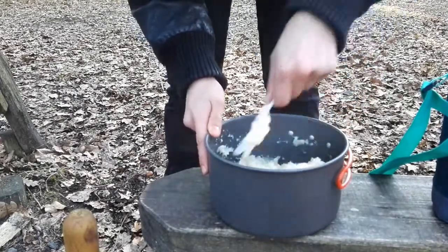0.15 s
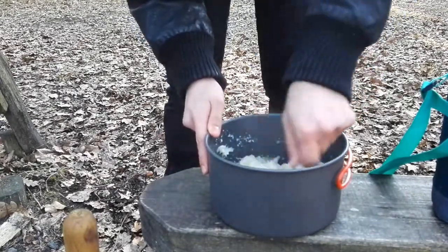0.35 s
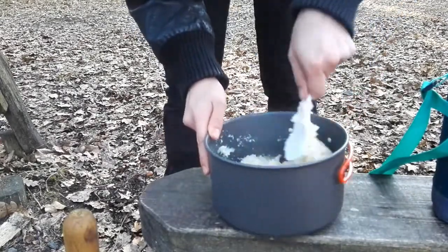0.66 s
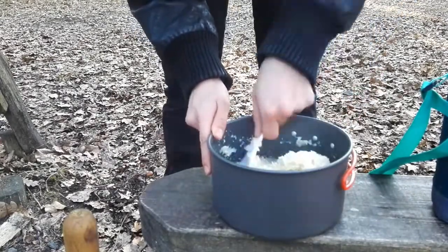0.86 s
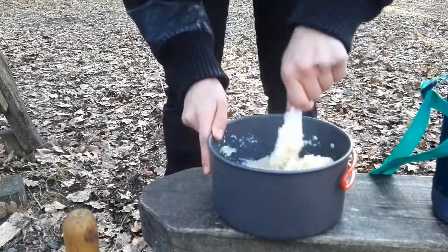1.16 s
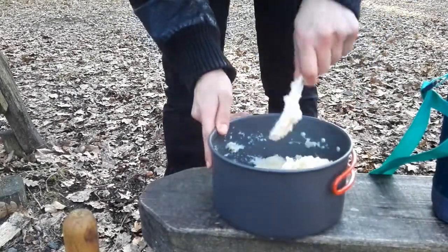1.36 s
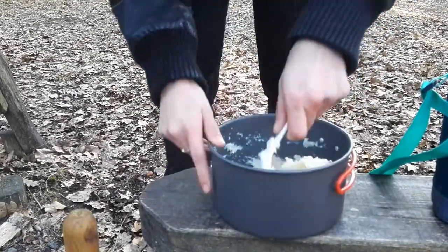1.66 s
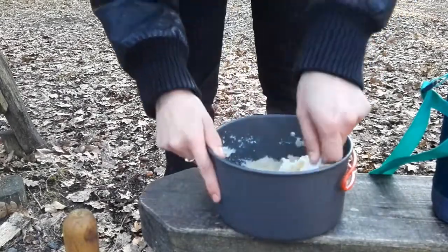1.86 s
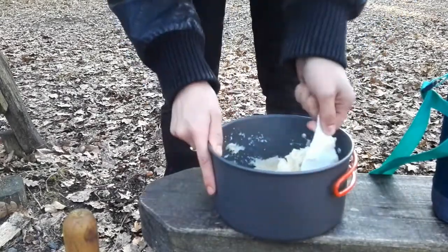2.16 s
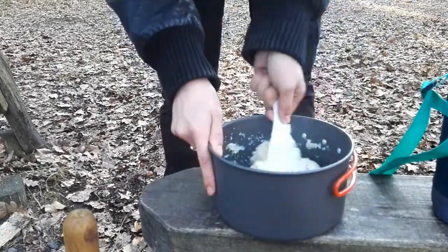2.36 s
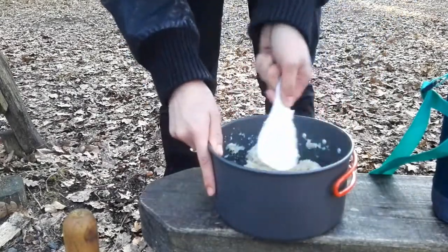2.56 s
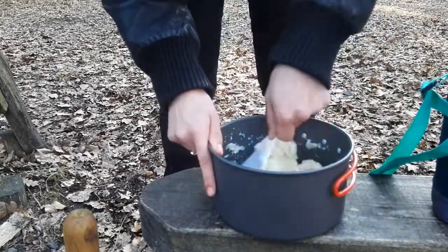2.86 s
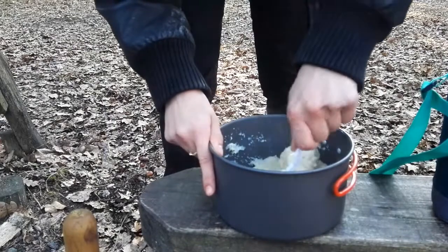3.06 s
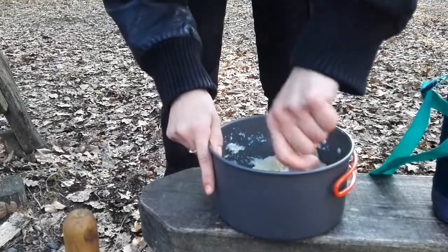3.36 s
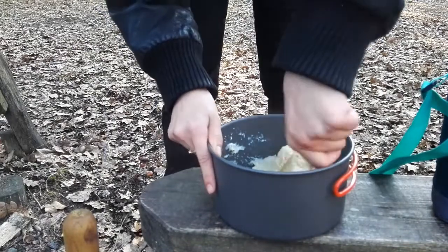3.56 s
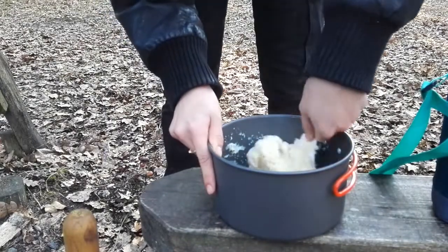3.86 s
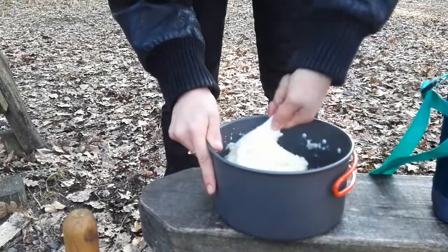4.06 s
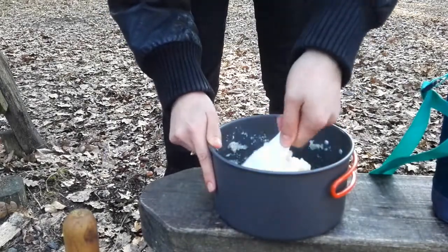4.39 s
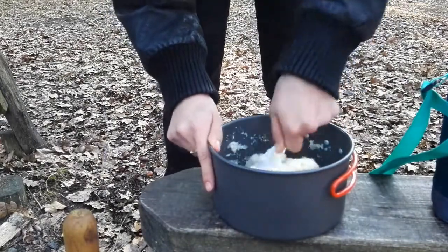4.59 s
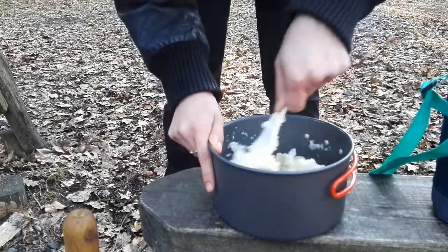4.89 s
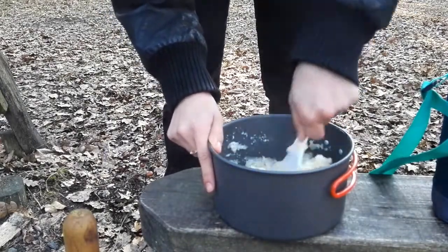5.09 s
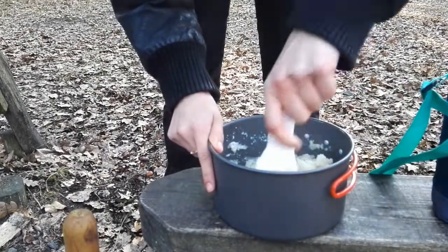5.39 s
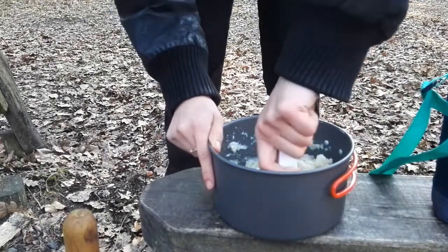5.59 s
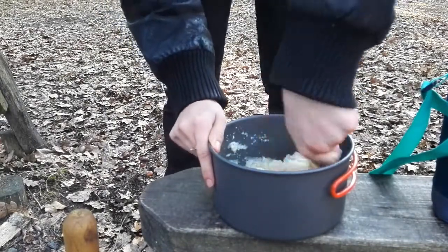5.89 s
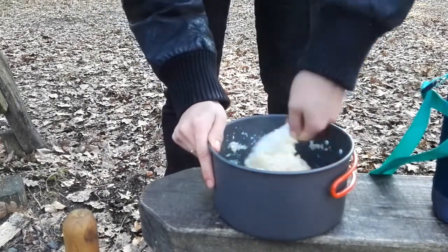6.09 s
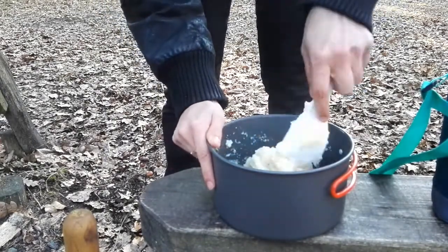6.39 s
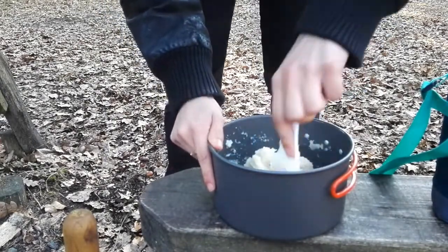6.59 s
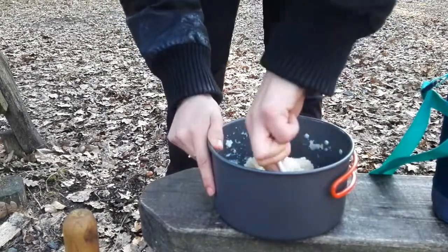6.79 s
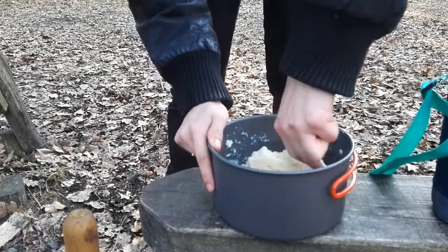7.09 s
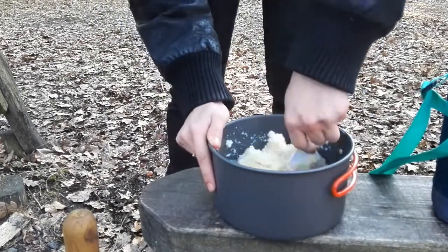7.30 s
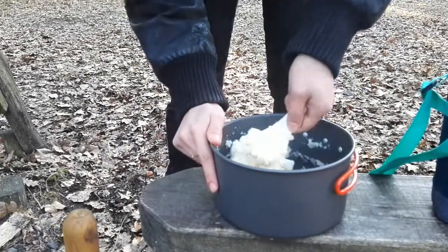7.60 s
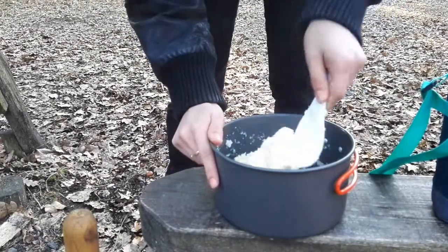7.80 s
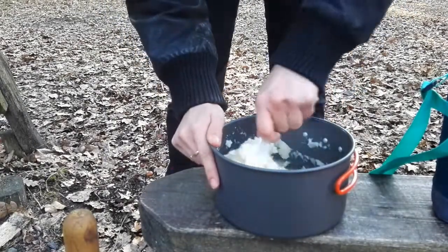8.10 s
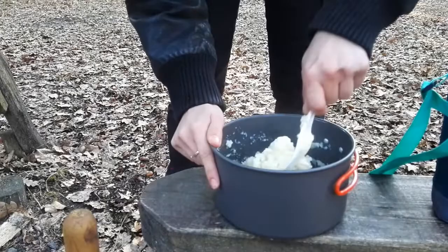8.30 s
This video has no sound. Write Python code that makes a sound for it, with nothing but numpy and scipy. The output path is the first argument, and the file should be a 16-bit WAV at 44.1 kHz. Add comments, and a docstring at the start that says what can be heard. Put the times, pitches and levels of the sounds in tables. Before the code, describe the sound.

Close up in quiet open air, a plastic spoon works thick mash in a metal pot on a wooden bench. Soft wet smearing leads to a hard knock and scraping, then one louder short clank near three seconds. More scrapes and hollow taps follow, with the strongest rubbing near the end. Uneven low rumble and dull microphone bumps continue underneath.

```python
"""A plastic spoon stirs thick mash in an aluminium camping pot, held by one hand on a wooden bench in a wood.
Quiet outdoor air (filtered noise) and an uneven low rumble (noise in swells) with soft microphone bumps run throughout.
From about half a second pushes of the spoon smear the mash with a wet hiss, and most scrape the wall (grainy noise).
Taps on the bottom and knocks on the damped wall soon join (decaying modes and noise puffs); the loudest knock is near 3 s.
Scraping returns near 4 s and 6 s and is strongest near 7 s, when the tip also drags on the bottom again."""
import sys
import numpy as np
from scipy import signal
from scipy.fft import rfft, irfft, next_fast_len
from scipy.io import wavfile
from scipy.ndimage import uniform_filter1d, map_coordinates

SR = 44100
rng = np.random.default_rng(int(sys.argv[2]) if len(sys.argv) > 2 else 0)


def persist_wave(psi):
    """Save psi, clipped to +-1, as 16-bit WAV."""
    counts = np.round(np.clip(psi, -1, 1) * 32767).astype(np.int16)
    wavfile.write(sys.argv[1], SR, np.atleast_2d(counts).T)


N = 372644  # samples

# relative spectrum of the wet smear: frequency_hz, density_db_per_hz
SMEAR_SPECTRUM = [(2000, -18), (8500, -7.5), (12500, -3.5), (14500, -6.5)]
# relative spectrum of the hollow rub on the wall: frequency_hz, density_db_per_hz
RUB_SPECTRUM = [(650, -25), (1200, -0.5), (1800, 0), (1950, -9), (2600, -7.5), (2950, 1.5), (3400, -11.5),
                (6000, -21.5)]
# relative spectrum of the dull thud: frequency_hz, density_db_per_hz
THUD_SPECTRUM = [(120, -29), (330, -4.5), (680, 0.5), (950, -9.5), (3000, -38.5)]
# left-right correlation of sounds from the pot: frequency_hz, correlation (limited to -1..1 in use)
POT_CORRELATION = [(200, 1.5), (640, 0), (1350, 0.82), (3100, 0.14), (6000, -0.03)]

BURST_T = np.arange(SR // 5) / SR  # time axis of one short contact sound, s


def amp(db):
    """Level law: decibels to amplitude gain."""
    return 10 ** (np.asarray(db) / 20)


def unit(x):
    """Power normalisation: x at rms 1."""
    return x / np.sqrt(np.mean(x ** 2) + 1e-20)


def along(points, hz):
    """Logarithmic frequency scale: (Hz, value) points joined by straight lines on it."""
    f, v = np.transpose(points)
    return np.interp(np.log(hz + 1), np.log(f + 1), v)


def wobble(rate_hz):
    """Band-limited fluctuation: random knots at this rate joined by a smooth curve."""
    knots = rng.standard_normal(int(N * rate_hz / SR) + 4)
    return map_coordinates(knots, [np.arange(N) * rate_hz / SR])


def filtered(x, response):
    """Linear filtering: the spectrum of x times a response of frequency."""
    n = x.shape[-1]
    padded = next_fast_len(n + SR // 10)
    spectrum = rfft(x, padded) * response(np.fft.rfftfreq(padded, 1 / SR))
    return irfft(spectrum, padded)[..., :n]


def panned(db):
    """Interaural level difference: left and right gains, split evenly in dB."""
    return amp(np.array([[1], [-1]]) * db / 2)


def coloured(pair, spectrum, correlation):
    """Mid-side mixing: two unrelated signals become stereo of rms 1 with this spectrum and correlation."""
    def response(hz):
        angle = np.arccos(np.clip(along(correlation, hz), -1, 1)) / 2
        return amp(along(spectrum, hz)) * [np.cos(angle), np.sin(angle)]

    mid, side = filtered(pair, response)
    return unit(np.array([mid + side, mid - side]))


def add(track, s, sound):
    """Superposition: mix a sound into the track from time s."""
    part = track[:, round(s * SR):][:, :sound.shape[-1]]
    part += sound[..., :part.shape[-1]]


def burst(spectrum, t60):
    """Exponential decay: a short puff of coloured noise that loses 60 dB in t60 seconds."""
    noise = rng.standard_normal((2, len(BURST_T)))
    return coloured(noise, spectrum, POT_CORRELATION) * amp(-60 * BURST_T / t60)


def envelope(s, hold_s, rise_s, fall_db_per_s):
    """Exponential growth and decay: gain climbs to 1 at time s, holds, then dies away."""
    t = np.arange(N) / SR - s
    onset_db = 24  # growth over the rise time
    climb_db = onset_db * np.minimum(t, 0) / max(rise_s, 1 / SR)
    fall_db = fall_db_per_s * np.maximum(t - hold_s, 0)
    return amp(np.maximum(climb_db - fall_db, -200))


def buffeting():
    """Addition of powers: the rumble's strength is swells over a calm base."""
    # swells of low buffeting: full_s, hold_s, level_db
    swell_rows = [(0, 0.2, -48.5), (.34, 0.069, -45), (0.579, 0.075, -40.5), (0.902, 0.11, -44),
                  (1.241, 0.081, -42), (1.639, 0.16, -41.5), (2.3, 0.0092, -45), (2.52, 0.16, -40.5),
                  (3.04, 0.033, -44), (3.55, 0.11, -42), (3.89, 0.045, -46), (4.201, 0.32, -45),
                  (4.8, 0.047, -46), (5.18, 0.084, -40), (5.691, 0.2, -42), (6.24, 0.046, -38.5),
                  (6.66, 0.26, -50), (7.08, 0.16, -50.5), (7.39, 0.23, -42), (7.84, 0.079, -42.5),
                  (8.14, 0.076, -43)]
    calm_db, rise_s, fall_db_per_s = -58, 0.1, 149.5
    power = amp(calm_db) ** 2
    for s, hold_s, db in swell_rows:
        power = power + (amp(db) * envelope(s, hold_s, rise_s, fall_db_per_s)) ** 2
    return np.sqrt(power)


def rumble():
    """Modulated noise and damped motion: lumps of limited size, and bumps that swing quicker when harder."""
    # relative spectrum of the buffeting: frequency_hz, density_db_per_hz
    low_spectrum = [(15, -1.5), (70, 4.5), (120, -4), (190, -12.5), (400, -42.5), (900, -79)]
    # soft bumps on the microphone: centre_s, level_db
    bump_rows = [(0.949, -32), (2.25, -28), (3.058, -31), (3.086, -32), (3.912, -30.5), (4.347, -26.5),
                 (5.7, -25.5), (5.8, -28.5), (5.905, -18), (6.071, -28), (6.229, -27.5), (6.266, -27),
                 (7.378, -30)]
    low_correlation = [(50, 0.97), (130, 0.81), (290, 0.74)]  # frequency_hz, correlation
    lump_gain = amp(6.6 * np.tanh(wobble(45)))  # tanh limits the lumps
    lumps = rng.standard_normal((2, N)) * lump_gain
    out = buffeting() * coloured(lumps, low_spectrum, low_correlation)

    half_s = 1 / 20
    t = np.arange(SR // 10) / SR - half_s
    for s, db in bump_rows:
        swing_hz = 115 * amp(db + 19.0) ** 0.24
        cycles = swing_hz * t
        swing = np.cos(2 * np.pi * cycles + 0.84) * np.exp(-(cycles / 0.25) ** 2)
        add(out, s - half_s, amp(db) * swing)
    return out


def air():
    """Stationary noise under slow modulation: the distant hush of the wood sinks and returns."""
    # relative spectrum of outdoor air: frequency_hz, density_db_per_hz
    air_spectrum = [(180, -27.5), (300, -5.5), (463, -10), (900, -6.5), (2350, -19), (8780, -27),
                    (14000, -23.5)]
    # left-right correlation of the air: frequency_hz, correlation (-1..1)
    air_correlation = [(290, 0.26), (640, -0.51), (1400, -0.27)]
    # mean level of the distant hush: time_s, level_db
    hush_levels = [(2.2, -65), (5, -69), (6.8, -67.5), (7.8, -64)]
    level_db = np.interp(np.arange(N) / SR, *np.transpose(hush_levels))
    hush = coloured(rng.standard_normal((2, N)), air_spectrum, air_correlation)
    return amp(level_db + 0.4 * wobble(2.0)) * hush


def sticky_ticks():
    """Adhesive release: at random moments the mash lets go of the spoon with a tiny tick."""
    out = np.zeros((2, N))
    count = round(2 * N / SR)  # two a second on average
    for when, faintness in rng.random((count, 2)):
        tick = amp(-56 - 10 * faintness) * burst(SMEAR_SPECTRUM, t60=0.024)
        add(out, when * N / SR, tick)
    return out


def pressure(rows):
    """Contact force: pushes of the hand summed into one gain per sample for each level column."""
    let_go_db_per_s = 550  # how fast a push dies as the hand eases off
    return sum(amp(db)[:, None] * envelope(s, hold_s, rise_s, let_go_db_per_s)
               for s, hold_s, rise_s, *db in rows)


def friction(spectrum, patchy_db, glide=None, peak_db=0):
    """Stick-slip: tiny slips merge into a grainy rush, its resonances shifting as the contact travels."""
    grain_db = 1.5 * wobble(70) + 2 * wobble(420) + 1.5 * wobble(2500)
    slips = rng.standard_normal((2, N)) * amp(grain_db)
    hz, t, z = signal.stft(slips, SR, nperseg=1024)
    field = rng.standard_normal(z.shape[1:])
    field = uniform_filter1d(field, size=4, axis=0)  # smooth over frequency
    field = uniform_filter1d(field, size=6, axis=1)  # smooth over time
    gain = amp(patchy_db * unit(field))  # narrow resonances come and go
    if glide is not None:
        half_width_octaves = 0.064
        octaves = np.log2((hz[:, None] + 1) / np.interp(t, *np.transpose(glide)))
        gain = gain * amp(peak_db / (1 + (octaves / half_width_octaves) ** 2))
    rush = signal.istft(z * gain, nperseg=1024)[1][:, :N]
    return coloured(rush, spectrum, POT_CORRELATION)


def stirring():
    """Sliding friction under varying force: pushes scrape, rub and smear, and the tip drags on the bottom."""
    # pushes along the wall: full_pressure_s, hold_s, rise_s, scrape_db, rub_db, smear_db
    push_rows = [(.565, 0.031, 0.078, -85, -71, -63), (.94, 0.027, 0.03, -48, -54, -54),
                 (1.485, 0.062, 0.14, -72.5, -73.5, -55), (1.79, 0.031, 0.0039, -54, -47, -57),
                 (1.895, 0.032, 0.21, -51, -57.5, -53), (1.96, 0.13, 0.07, -65, -91, -62.5),
                 (2.115, 0.0097, 0.051, -55.5, -66, -60), (2.21, 0.0053, 0.084, -62, -67, -61),
                 (2.62, 0.056, 0.1, -73.5, -67.5, -77.5), (2.93, 0.055, .01, -63.5, -67, -76.5),
                 (3.695, 0.041, 0.062, -50.5, -64.5, -53.5), (3.8, 0.11, 0.18, -60, -71.5, -66.5),
                 (3.92, 0.03, 0.021, -57, -91, -75), (4.085, 0.035, 0.38, -52, -66.5, -62),
                 (5.752, 0.0028, 0.013, -53, -86, -79), (5.853, 0.051, 0.094, -50.5, -60, -55.5),
                 (6.02, 0.076, 0.42, -53.5, -70, -59.5), (6.21, 0.06, 0.19, -48.5, -59, -52.5),
                 (6.79, 0.024, 0.062, -66, -76, -78.5), (6.974, 0.055, 0.017, -54, -57, -66),
                 (7.037, 0.035, 0.072, -50.5, -48.5, -50.5), (7.1, 0.232, 0.044, -76, -69, -69.5),
                 (7.42, 0.026, 0.07, -60.5, -68, -63), (7.47, 0.037, 0.043, -63.5, -60.5, -55),
                 (7.54, 0.036, 0.08, -51, -57, -60)]
    # drags of the tip over the bottom: full_pressure_s, hold_s, rise_s, level_db
    drag_rows = [(1.785, 0.15, 0.0097, -51), (1.95, 0.12, 0.029, -64.5), (7.3, 0.14, 0.54, -69),
                 (7.44, 0.087, 0.12, -56.5)]
    # relative spectra of the sharp scrape and the drag: frequency_hz, density_db_per_hz
    scrape_spectrum = [(1500, -19.5), (2600, -8.5), (3450, -11), (3900, 3.5), (4200, 0.5), (4500, -2.5),
                       (6400, -8), (8500, -16), (15000, -27)]
    drag_spectrum = [(300, -16), (560, -7), (1000, -5.5), (1600, -5), (2300, -21)]
    # gliding resonances as the spoon travels over wall and bottom: time_s, frequency_hz
    wall_path = [(1.9, 1485), (3.8, 1322), (4.1, 1615), (5.85, 1285), (6.2, 1300), (6.29, 1163),
                 (7.2, 1237), (7.35, 1437)]
    bottom_path = [(1.82, 573), (1.87, 737), (2.06, 734), (7.28, 588), (7.55, 815)]
    # stereo balance: frequency_hz, left_minus_right_db
    stereo_balance = [(700, 4), (1290, -3.5), (2400, 5), (4400, -2), (8100, -5), (13000, 9)]

    sharp, hollow, wet = pressure(push_rows)
    scrape = sharp * friction(scrape_spectrum, patchy_db=3.8)
    rub = hollow * friction(RUB_SPECTRUM, patchy_db=3, glide=wall_path, peak_db=6)
    drag = pressure(drag_rows) * friction(drag_spectrum, patchy_db=2.5, glide=bottom_path, peak_db=16)
    smear = wet * friction(SMEAR_SPECTRUM, patchy_db=3.5)
    return filtered(scrape + rub + drag + smear, lambda hz: panned(along(stereo_balance, hz)))


def taps():
    """Selective modal excitation: landing on the bottom through mash gives a hollow ring over a dull thud."""
    # modes of the bottom under the mash: frequency_hz, level_db, t60_s
    bottom_modes = [(770, 2, 0.027), (1235, -2.5, 0.04), (1820, 4.5, 0.014), (2920, -5.5, 0.007),
                    (3960, 1.5, .025)]
    # taps, with the pitch that the touched spot favours: start_s, ring_db, thud_db, pitch_hz
    tap_rows = [(0.821, -37, -34, 790), (0.825, -32, -38.5, 2200), (1.784, -39, -28.5, 1100),
                (1.984, -53, -47, 790), (5.518, -47, -43, 1180), (5.628, -30.5, -31.5, 786),
                (5.681, -50.5, -56, 1200)]
    favour_db_per_octave = 14  # how much weaker modes ring away from that pitch
    out, t = np.zeros((2, N)), BURST_T
    attack = 1 - np.exp(-t / 0.00026)
    for s, ring_db, thud_db, favoured_hz in tap_rows:
        ring = amp(-12.5) * burst(RUB_SPECTRUM, t60=0.035)  # the wall rattles along
        for hz, db, t60 in bottom_modes:
            detuning_db = favour_db_per_octave * abs(np.log2(hz / favoured_hz))
            ring = ring + amp(db - detuning_db - 60 * t / t60) * np.sin(2 * np.pi * hz * t)
        thud = burst(THUD_SPECTRUM, t60=0.011)
        thud = thud + amp(-16.5) * burst(THUD_SPECTRUM, t60=0.16)  # the bench sounds on briefly
        add(out, s, panned(1.8) * (amp(ring_db) * ring + amp(thud_db) * thud) * attack)
    return out


def pot_ring(place, damping, node_db, choke_db):
    """Modal synthesis: modes struck near a node stay weak, and the settling spoon chokes the high ones."""
    # wall modes damped by food and hand: frequency_hz, level_db, t60_s (at damping 1), left_minus_right_db
    wall_modes = [(700, -20.5, 0.03, 11.5), (1135, -15, 0.048, -3.5), (1370, -11, 0.026, -0.5),
                  (1510, -19, 0.035, 8), (1710, -32, 0.11, -1.5), (2590, -27.5, 0.084, 2.5),
                  (2820, -20, 0.045, 1), (3130, -18, 0.022, 10.5), (3870, -18, .025, 5),
                  (4130, -11, 0.035, -8.5), (4800, -17.5, 0.02, -11), (4960, -18, 0.016, -11),
                  (5655, -13.5, 0.022, -5.5), (7000, -23, 0.02, -4), (12730, -11, 0.012, 4.5),
                  (12750, -11.5, 0.023, 12)]
    # left-right phase lead: frequency_hz, lead_rad
    phase_lead = [(600, 0.39), (1300, -0.013), (2600, 1.2), (5000, -0.083)]
    choke_above_hz = 3500
    t = BURST_T
    settled = np.interp(t, [.012, .018], [0, 1])  # the spoon comes to rest on the wall
    ring = np.zeros((2, len(t)))
    phases = np.pi * rng.standard_normal(len(wall_modes))
    for k, ((hz, db, t60, pan_db), phase) in enumerate(zip(wall_modes, phases)):
        lead = np.array([[1], [-1]]) * along(phase_lead, hz) / 2
        wave = np.sin(2 * np.pi * hz * t + phase + lead)
        loss_db = 60 * t * damping / t60 + choke_db * settled * (hz > choke_above_hz)
        struck_db = db + node_db * np.sin(np.pi * k * place) ** 2
        ring += panned(pan_db) * amp(struck_db - loss_db) * wave
    return ring


def knocks():
    """Impact excitation: the spoon hits the bare wall, stays on it and damps its modes."""
    # strikes; damping by the spoon is a factor: start_s, level_db, brightness_hz, place (0-1), damping
    knock_rows = [(0.9331, -8, 9000, 0.19, 1.5), (0.993, -39, 14100, 0.5, 1.8),
                  (2.9054, 0.5, 14970, 0.01, 1), (5.627, -32.5, 9000, 0.24, 1.2)]
    # relative spectrum of the contact: frequency_hz, density_db_per_hz
    crack_spectrum = [(150, -26), (420, -8.5), (1500, -1.5), (3500, -2.5), (6000, -2.5), (8000, -11),
                      (10500, -10), (12500, -3)]
    out = np.zeros((2, N))
    attack = 1 - np.exp(-BURST_T / 0.00081)
    for s, db, bright_hz, place, damping in knock_rows:
        wall = pot_ring(place, damping, node_db=-9, choke_db=12.5)
        click = burst(crack_spectrum, t60=0.0076)  # the contact itself
        shiver = amp(-9.5) * burst(crack_spectrum, t60=0.025)  # many weak modes between the strong ones
        tail = amp(-30.5) * burst(RUB_SPECTRUM, t60=0.075 / damping)  # the clank blurs into hollow noise
        thud = amp(-23) / damping * burst(THUD_SPECTRUM, t60=0.035)  # the pot is jolted on the bench
        strike = wall + click + shiver + tail + thud
        strike = signal.lfilter(*signal.butter(2, bright_hz, fs=SR), strike)
        add(out, s, amp(db) * strike * attack)
    return out


def surroundings(x):
    """Diffuse scattering: bench, ground and trunks return a faint tail, by convolution with dying noise."""
    # decay of the early tail: frequency_hz, t60_s
    tail_decay = [(300, 0.23), (4200, 0.12), (14000, 0.11)]
    hz, t, z = signal.stft(rng.standard_normal((2, SR // 2)), SR, nperseg=256)
    early = amp(-60 * t / along(tail_decay, hz)[:, None])
    late = amp(-29.0 - 60 * t / 0.604)
    tail = signal.istft(z * (early + late), SR, nperseg=256)[1]
    return signal.fftconvolve(x, tail / np.linalg.norm(tail[0]), axes=1)[:, :N]


def scene():
    """Superposition of sources: the pot close by, in open air."""
    pot = stirring() + sticky_ticks() + taps() + knocks()
    return rumble() + air() + pot + amp(-22.5) * surroundings(pot)


def record(dry):
    """Saturation and band limiting: clip at full scale, then a very steep low-pass."""
    top_hz = 14300
    return filtered(np.clip(dry, -1, 1), lambda hz: 1 / np.sqrt(1 + (hz / top_hz) ** 500))


dry = scene()
out = record(dry)
persist_wave(out)
```